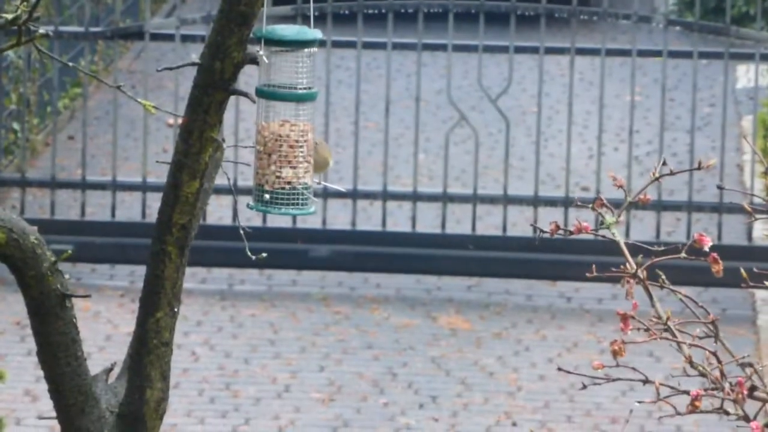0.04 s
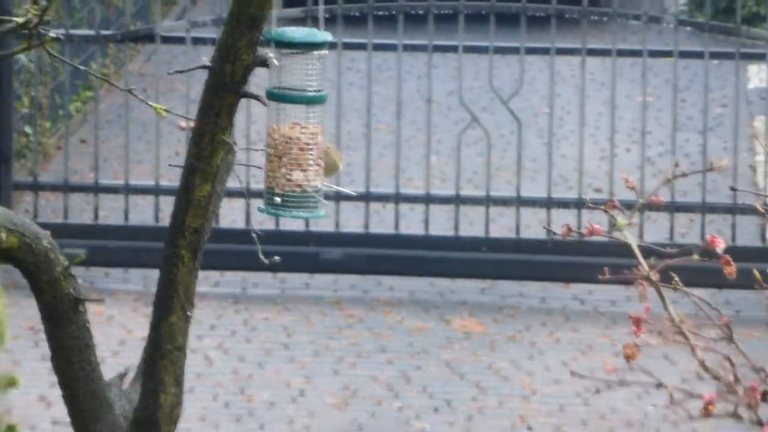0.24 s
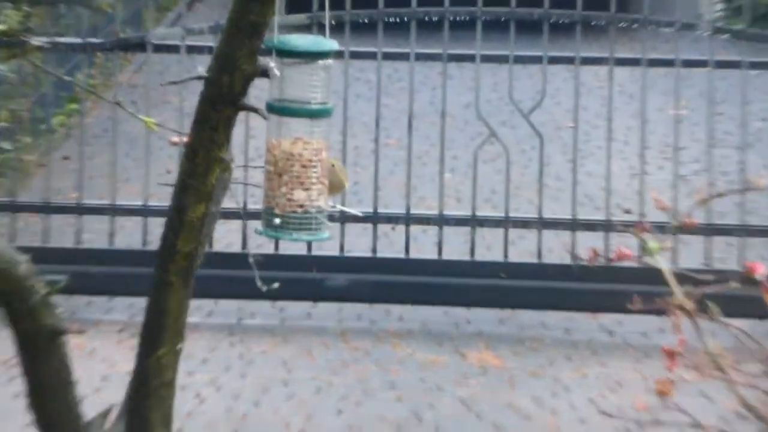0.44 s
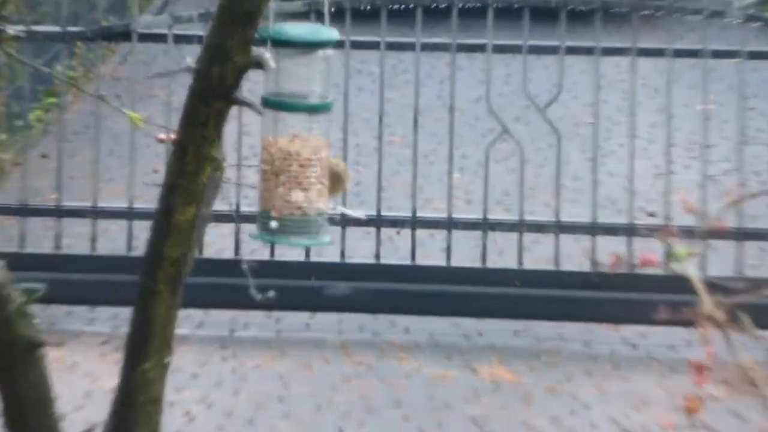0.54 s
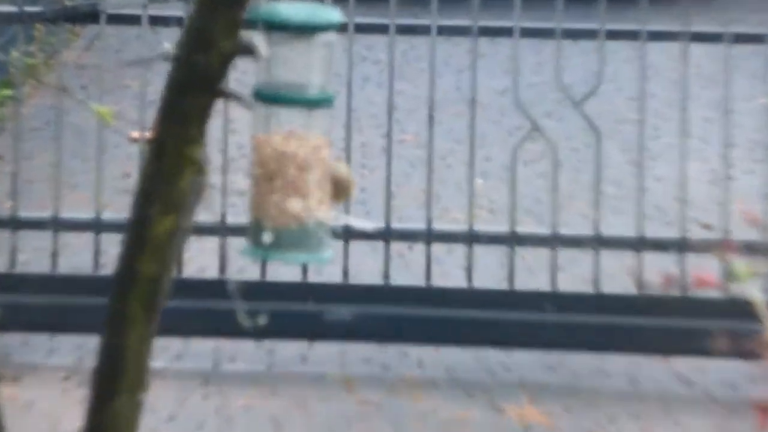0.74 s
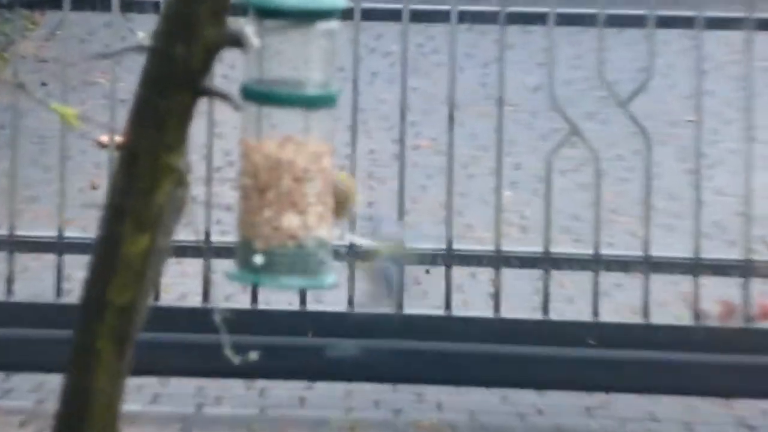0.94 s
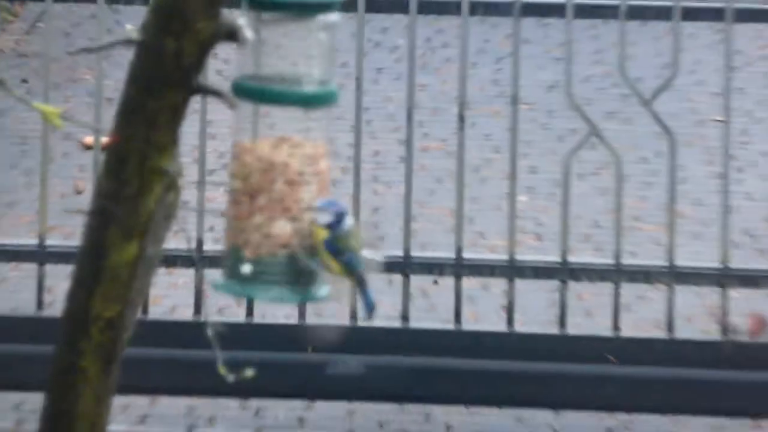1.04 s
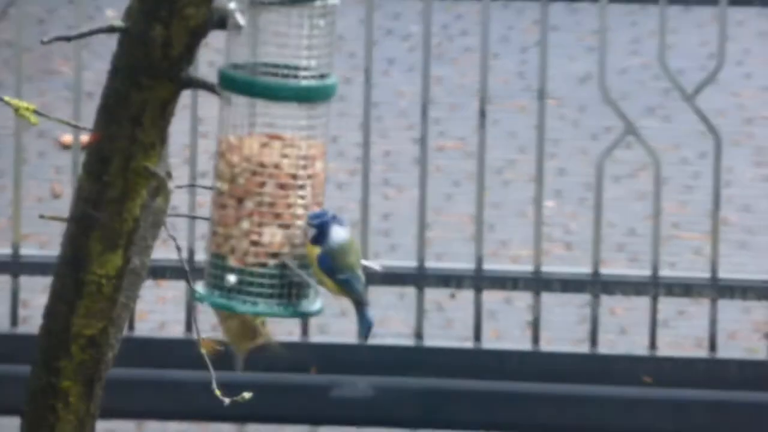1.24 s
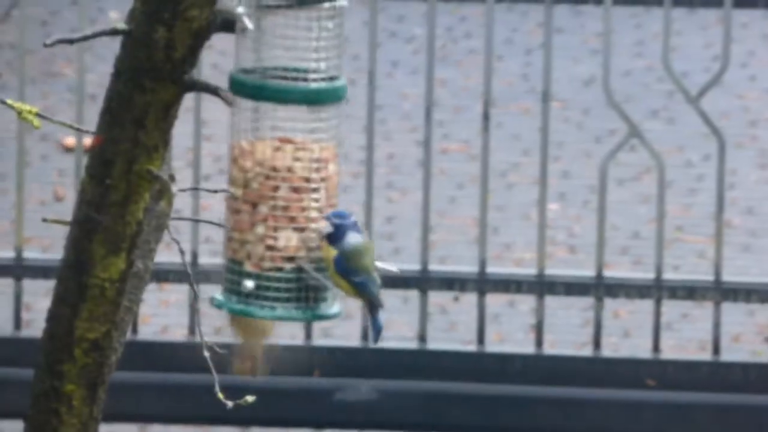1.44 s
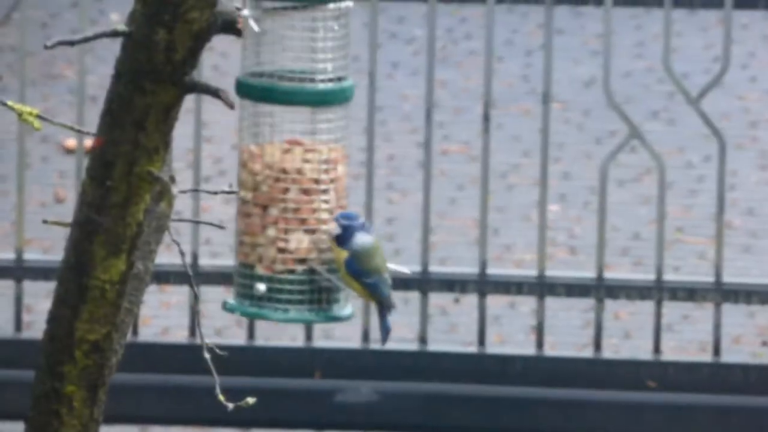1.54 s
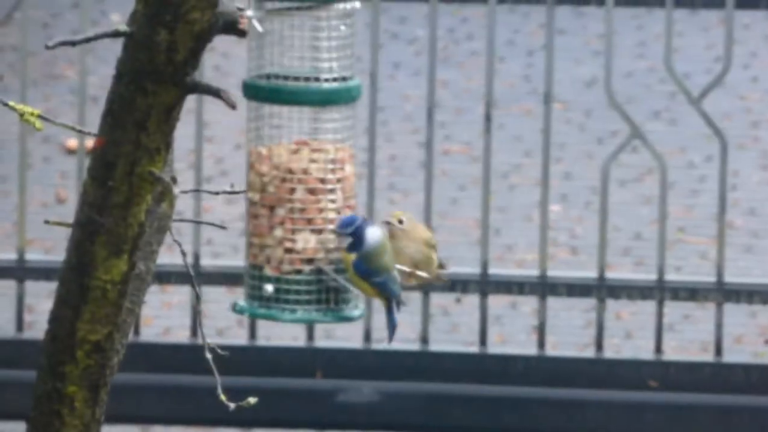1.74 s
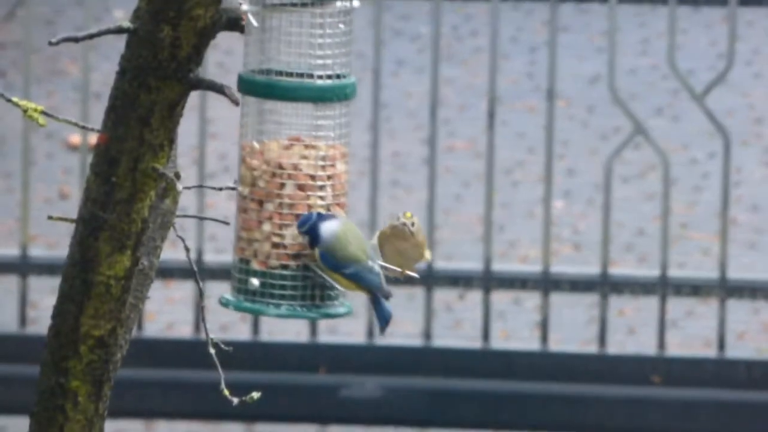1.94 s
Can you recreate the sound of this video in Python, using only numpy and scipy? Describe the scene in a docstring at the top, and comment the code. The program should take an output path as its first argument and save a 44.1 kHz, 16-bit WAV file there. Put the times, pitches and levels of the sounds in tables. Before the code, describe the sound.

Close to the camera's own microphone, fingers rub and snap its plastic shell, the zoom gears hiss and growl unevenly, another sharp click comes near the end of the whir, then quiet low background noise outdoors.

```python
"""Camera handling and zoom motor

A small camera outdoors: fingers rub (gritty noise) and click (ringing modes) its plastic shell, with dull knocks.
The zoom motor whirs for about a second: resonant gear hiss, a near-sine note and a low growl of short glides.
Behind it lie coloured noise, narrow-band hum and two faint tones that swell briefly late on."""
import sys
import numpy as np
from scipy import signal
from scipy.io import wavfile
from scipy.ndimage import uniform_filter1d

SR = 44100
rng = np.random.default_rng(int(sys.argv[2]) if len(sys.argv) > 2 else 0)


def invert_db(x):
    """Field ratio 10**(x/20) for x, a level in decibels (scalar or array-like)."""
    u = np.asarray(x, float) / 20
    return 10 ** u


def transcribe(u):
    """Save the signal u as a 16-bit wav file named by the first command-line argument.

    u: samples, shape (n,) or (channels, n), limited to [-1, 1]; the rate is SR.
    q: integer samples, one column per channel.
    """
    v = np.clip(np.atleast_2d(u).T, -1, 1)
    q = np.round(v * 32767).astype(np.int16)
    wavfile.write(sys.argv[1], SR, q)


N = 88200
HISS_EDGE_HZ = 15500


def evened(x):
    """Scales to rms 1."""
    return x / np.sqrt(np.mean(x ** 2) + 1e-20)


def read(points, hz):
    """Reads a spectrum on a log frequency axis."""
    f, value = np.transpose(points)
    return np.interp(np.log(hz + 1), np.log(f + 1), value)


def add(mix, start_s, sound):
    """Mixes a sound in at start_s."""
    part = mix[max(round(start_s * SR), 0):][:len(sound)]
    part += sound[:len(part)]


def high_pass(x, hz):
    """Second-order Butterworth high-pass."""
    return signal.sosfilt(signal.butter(2, hz, "high", fs=SR, output="sos"), x)


def resonate(x, hz, width_hz):
    """Two equal resonances in a row: shift hz to zero, smooth with one pole, shift back."""
    turn = np.exp(2j * np.pi * np.cumsum(hz * np.ones(len(x))) / SR)
    r = np.exp(-np.pi * width_hz / SR)
    for _ in range(2):
        x = 2 * (turn * signal.lfilter([1 - r], [1, -r], x / turn + 1e-18)).real
    return x


def narrow_noise(hz, width_hz):
    """White noise through a resonance, rms 1."""
    return evened(resonate(rng.standard_normal(N), hz, width_hz))


def slow_noise(samples):
    """White noise smoothed twice, rms 1."""
    return evened(uniform_filter1d(uniform_filter1d(rng.standard_normal(N), size=samples), size=samples))


def noise(colour, patchy_db):
    """Random short-time spectra of a given colour with drifting patches (patchy_db rms); overall rms 1."""
    frames, hz = N // 256 + 5, np.fft.rfftfreq(1024, 1 / SR)
    a, b, patches = rng.standard_normal((frames, 513, 3)).T
    patches = uniform_filter1d(patches, size=12, axis=0)  # over frequency
    patches = evened(uniform_filter1d(patches, size=10, axis=1))  # over time
    gain = invert_db(read(colour, hz)[:, None] + patchy_db * patches)
    z = (a + 1j * b) * gain * (hz < HISS_EDGE_HZ)[:, None]
    return evened(signal.istft(z, nperseg=1024, noverlap=768)[1][:N])


def zoom():
    """Motor envelope over hiss, note and growl; the gear hiss also swells once before the motor runs."""
    on_s, spin_up_s, off_s, run_down_s = 0.32, 0.068, 1.255, 0.014
    t = np.arange(N) / SR
    on = np.interp(t, [on_s, on_s + spin_up_s, off_s, off_s + run_down_s], [0, 1, 1, 0])
    # the gears slip briefly before the motor runs
    twitch_s, rise_s, fall_s, twitch_db = 0.2676, 0.018, 0.049, -1.5
    twitch = invert_db(twitch_db) * np.interp(t - twitch_s, [0, rise_s, rise_s + fall_s], [0, 1, 0])
    note, phase = motor_note()
    return (on + twitch) * gear_hiss(phase) + on * (note + growl())


def motor_note():
    """Sine along a drifting pitch, its level wavering slowly; returns the note and its phase."""
    # motor pitch track: time_s, pitch_hz, rms_db
    track = [ [(0.38, 348.7, -63), (0.47, 395.5, -66), (0.612, 361.7, -59.5), (0.79, 362.3, -62),
             (0.838, 375.7, -59.5), (0.95, 375, -64)], ][0] + [(1.06, 373.7, -58.5), (1.2, 365.7, -63),
             (1.26, 363, -69)]
    waver_db = 2.5  # rms
    t = np.arange(N) / SR
    time_s, pitch_hz, rms_db = np.transpose(track)
    phase = 2 * np.pi * np.cumsum(np.interp(t, time_s, pitch_hz)) / SR
    level_db = np.interp(t, time_s, rms_db) + waver_db * slow_noise(900)
    return np.sqrt(2) * invert_db(level_db) * np.sin(phase), phase


def gear_hiss(phase):
    """Noise throbbing at the motor note and half of it, partly ringing in the lens barrel."""
    # lens barrel resonances: pitch_hz, width_hz (of each of two passes), relative density_db
    barrel = [(1650, 230, -1), (2000, 150, 0), (3230, 250, -8), (3770, 360, -1.5), (4480, 350, -5.5),
              (5350, 480, -8.5), (7650, 390, -10.5), (8390, 660, -4), (10090, 830, -5.5), (10850, 440, -10),
              (12770, 750, -12)]
    # hiss between the resonances: frequency_hz, relative density_db (per Hz)
    broad_colour = [(180, -35), (300, -15), (400, -10.5), (590, -15.5), (1370, -14), (2650, -13),
                    (3690, -6.5), (6570, -18), (8420, -17.5), (11000, -18.5), (11900, -36), (12600, -20),
                    (13900, -31), (14700, -27), (15500, -29)]
    hiss_db, broad_db, patch_db = -54.5, -52.5, 3.5
    tooth_depth, turn_depth = 0.3, 0.087
    throb = 1 + tooth_depth * np.sin(phase) + turn_depth * np.sin(phase / 2)
    teeth = throb * noise([(20, 0), (20000, 0)], patchy_db=patch_db)
    ringing = np.zeros(N)
    for hz, width_hz, db in barrel:
        ringing += invert_db(db) * np.sqrt(width_hz) * evened(resonate(teeth, hz, width_hz))
    broad = throb * noise(broad_colour, patchy_db=2.5)
    return invert_db(hiss_db) * evened(ringing) + invert_db(broad_db) * broad


def growl():
    """Short gliding sines that jump in pitch, over a narrow low rumble."""
    # growl notes: start_s, length_s, first_hz, last_hz, rms_db (at mid-note)
    glides = [(.41, 0.11, 188.5, 152, -58.5), (0.506, 0.062, 258.4, 265, -55.5),
              (0.57, 0.067, 266, 206, -54.5), (.64, .055, 190, 201, -58), (0.684, 0.049, 237, 234, -53),
              (0.744, .17, 264, 239, -54), (0.912, 0.044, 294, 304, -51.5), (0.947, 0.052, 252, 237, -54.5),
              (0.985, 0.051, 328, 343, -53), (1.021, 0.031, 250, 263, -54), (1.055, .04, 214, 211, -57),
              (1.086, 0.048, 256, 248, -55.5), (1.149, 0.077, 221, 274.4, -52.5),
              (1.215, 0.05, 193, 204, -53)]
    bed_db, bed_hz, bed_width_hz, waver_hz = -63, 230, 140, 8
    out = invert_db(bed_db) * narrow_noise(bed_hz, bed_width_hz)
    waver = waver_hz * slow_noise(600)
    for start_s, length_s, first_hz, last_hz, db in glides:
        u = np.arange(0, 1, 1 / (length_s * SR))
        pitch_hz = first_hz + (last_hz - first_hz) * u + waver[round(start_s * SR):][:len(u)]
        phase = 2 * np.pi * (np.cumsum(pitch_hz) / SR + rng.random())
        envelope = np.sin(np.pi * u) ** 0.32
        add(out, start_s, np.sqrt(2) * invert_db(db) * envelope * np.sin(phase))
    return out


def clicks():
    """Lever and shell snaps: tick plus contact chatter drives the shell modes; longer contact, narrower band."""
    # plastic shell modes: pitch_hz, relative level_db, t60_s
    shell = [(1600, -13, 0.021), (2040, -30, 0.013), (2051, -4, 0.027), (2336, -4.5, 0.016),
             (2940, -0.5, .012), (3850, -1.5, 0.012), (4360, -3, .008), (5230, 17, 0.0013),
             (6830, -4.5, 0.0067), (8730, -1.5, 0.0095), (10000, 0.5, .005), (10700, -13, 0.0059),
             (13100, -30, .005), (14500, -28, .004)]
    # snaps: time_s, peak_db, chatter_hz, contact_ms (Gaussian sigma), tick_db (over unit-energy chatter)
    snaps = [(0.0277, -37.5, 4870, 0.19, -22), (.137, -32, 1690, 0.13, -1), (0.2022, -5, 5340, 0.07, 4),
             (.29, -33.5, 1820, 0.18, -14), (0.2957, -40, 1900, 0.23, -20), (.303, -42, 1500, .2, -20),
             (0.3601, -31, 1290, .2, -17), (1.0547, -20, 4430, 0.31, 1.5), (1.055, -26.5, 2100, .25, -30),
             (1.086, -25.5, 3500, 0.068, -18), (1.0865, -28.5, 3320, .12, -20), (1.088, -34, 3460, .1, -20),
             (1.125, -11.5, 4650, 0.19, -11), (1.125, -28, 2000, 0.35, -33),
             (1.155, -37.5, 1600, 0.33, -22), (1.186, -37.5, 1790, 0.35, -25),
             (1.295, -44.5, 1600, 0.23, -25), (1.614, -42, 2000, .2, -20), (1.628, -36.5, 2940, 0.26, -1)]
    out, t = np.zeros(N), np.arange(3000) / SR
    ring = sum(invert_db(db - 60 * t / t60_s) * np.sin(2 * np.pi * hz * t) for hz, db, t60_s in shell)
    ring = high_pass(ring, 1500)  # the small shell radiates little below this
    lag = t[:81] - t[40]
    for time_s, db, hz, contact_ms, tick_db in snaps:
        # band around the chatter pitch, narrower for a longer contact
        push = np.exp(-0.5 * (1000 * lag / contact_ms) ** 2) * np.cos(2 * np.pi * hz * lag)
        force = push / np.linalg.norm(push) + invert_db(tick_db) * (lag == 0)
        click = np.convolve(ring, force)
        add(out, time_s + lag[0], invert_db(db) * click / abs(click).max())
    return out


def knocks():
    """Dull knocks of hand and gear train: damped sines, high-passed."""
    # knocks: start_s, level_db (initial, ahead of the high-pass), pitch_hz, t60_s
    thuds = [(.002, -39.5, 504, 0.0072), (.057, -34.5, 307, 0.0076), (0.0579, -43, 110, .06),
             (.2895, -36, 467, 0.044), (.302, -45, 280, 0.046), (0.3583, -36, 990, 0.021),
             (.36, -40, 650, 0.02), (.361, -36.5, 457, 0.035), (0.3613, -36, 187, 0.044),
             (.362, -40, 132, 0.054), (1.045, -45.5, 100, 0.17), (1.254, -40.5, 445, .02),
             (1.2931, -40.5, 297, 0.0077), (1.3276, -37.5, 296, 0.0073)]
    out, t = np.zeros(N), np.arange(3000) / SR
    for start_s, db, hz, t60_s in thuds:
        knock = invert_db(db - 60 * t / t60_s) * np.sin(2 * np.pi * hz * t)
        add(out, start_s, high_pass(knock, 110))
    return out


def rubs():
    """Finger strokes: coloured noise roughened by random level grit."""
    # strokes over the shell: start_s, rise_s, fall_s, level_db (at the top)
    strokes = [(.012, .016, .014, -48), (.056, .002, .03, -45), (.078, .035, .025, -46),
               (1.0855, .002, .01, -40), (1.1, .004, .012, -43), (1.112, .011, .0015, -38)]
    # rub spectrum: frequency_hz, relative density_db (per Hz)
    colour = [(590, -31), (1000, -10), (1330, -14), (1640, -5), (2330, -8.5), (5560, -2.5), (9420, -20.5),
              (13300, -19.5), (15400, -22)]
    grit_db = 0.5  # rms
    stroke, t = np.zeros(N), np.arange(N) / SR
    for start_s, rise_s, fall_s, db in strokes:
        corners_s = [start_s, start_s + rise_s, start_s + rise_s + fall_s]
        stroke += invert_db(db) * np.interp(t, corners_s, [0, 1, 0])
    grit = invert_db(grit_db * evened(uniform_filter1d(rng.standard_normal(N), size=40)))
    return stroke * evened(grit * noise(colour, patchy_db=0.5))


def background():
    """Coloured noise for hiss and rumble, with hum and faint tones."""
    # floor spectrum: frequency_hz, relative density_db (per Hz)
    colour = [(12, -40), (20, -37), (104, -4.5), (166, -2.5), (196, -5.5), (324, -11.5), (405, -8),
              (441, -6.5), (521, -11.5), (814, -13), (910, -14), (1500, -15.5), (15600, -32.5)]
    # floor level over time: time_s, gain_db
    level = [(0, 4.5), (.5, -0.5), (1.3, 1.), (1.55, 0.5), (2, 0.5)]
    floor_db = -56.5
    t = np.arange(N) / SR
    gain = invert_db(floor_db + np.interp(t, *np.transpose(level)))
    return gain * noise(colour, patchy_db=0.5) + hum() + faint_ring()


def hum():
    """Wavering hum lines: narrow-band noise."""
    # hum lines: pitch_hz, width_hz (of each of two passes), rms_db
    lines = [(51, 16, -77.5), (100, 13.5, -71), (196, 7.9, -66.5), (386, 18, -77.5)]
    return sum(invert_db(db) * narrow_noise(hz, width_hz) for hz, width_hz, db in lines)


def faint_ring():
    """Two beating sines: very faint throughout, with one short swell together."""
    # tones: swell_start_s, pitch_hz, peak_db, swell_length_s
    tones = [(1.597, 1487, -59, .11), (1.597, 1588, -59, 0.11)]
    out, t = np.zeros(N), np.arange(N) / SR
    for start_s, hz, db, length_s in tones:
        # the end values hold before and after the swell
        swell = np.interp(t - start_s, [0, 0.008, 0.84 * length_s, length_s], [0.092, 1, 0.62, 0.13])
        out += invert_db(db) * swell * np.sin(2 * np.pi * (hz * t + rng.random()))
    return out


def flickering_side(steady):
    """Side signal: a weak, phase-scrambled copy of the steady sound, opened only for moments."""
    # moments of width: centre_s, half_length_s, gain_db
    moments = [(.005, 0.029, 7), (.185, .02, 2), (0.412, 0.034, 7), (.5, 0.029, 7), (.565, 0.018, 2.5),
               (0.687, 0.033, 5.5), (0.737, 0.021, 5), (0.798, 0.021, -1), (0.914, .02, 2.5),
               (0.959, 0.029, 9), (1.008, .03, 6), (1.336, 0.024, -1), (1.54, .04, -6), (1.607, 0.032, 4),
               (1.685, 0.048, -3), (1.81, 0.025, -0.5), (1.876, 0.049, 0.5), (1.959, 0.038, 2.5)]
    # side spectrum ahead of the moments' gain: frequency_hz, side_minus_mid_db
    side_colour = [(60, -23), (110, -20), (200, -27.5), (380, -24.5), (700, -18), (1290, -20), (2380, -19),
                   (4400, -18), (8120, -15), (15000, -16)]
    patch_db = 5.5  # rms
    hz, t, z = signal.stft(steady, SR, nperseg=256)
    gate = np.zeros(len(t))
    for centre_s, half_s, db in moments:
        gate += invert_db(db) * np.cos(np.pi / 2 * np.clip((t - centre_s) / half_s, -1, 1))
    patch = uniform_filter1d(rng.standard_normal(z.shape[::-1]).T, size=4, axis=0)
    patch = evened(uniform_filter1d(patch, size=9, axis=1))
    scramble = np.exp(2j * np.pi * rng.random(z.shape[::-1]).T)
    z = z * invert_db(patch_db * patch) * gate * invert_db(read(side_colour, hz))[:, None] * scramble
    return signal.istft(z, SR, nperseg=256)[1][:N]


def scene():
    """Nearly mono: handling in the middle, the steady sound with a flickering side."""
    low_pass = signal.firwin(511, HISS_EDGE_HZ, window=("kaiser", 9), fs=SR)
    steady = signal.oaconvolve(zoom() + background(), low_pass, "same")
    side = flickering_side(steady)
    mid = steady + clicks() + knocks() + rubs()
    return np.array([mid + side, mid - side])


def top_cut(x):
    """Nothing passes above the cut-off."""
    return signal.sosfilt(signal.butter(12, 16820, fs=SR, output="sos"), x)


def record(dry):
    """Band-limits the mix with a linear-phase low-pass."""
    edge_hz = 16600
    low_pass = signal.firwin(255, edge_hz, window=("kaiser", 9), fs=SR)
    mix = signal.oaconvolve(dry, low_pass[None], "same")
    return top_cut(mix)


dry = scene()
out = record(dry)
transcribe(out)
```